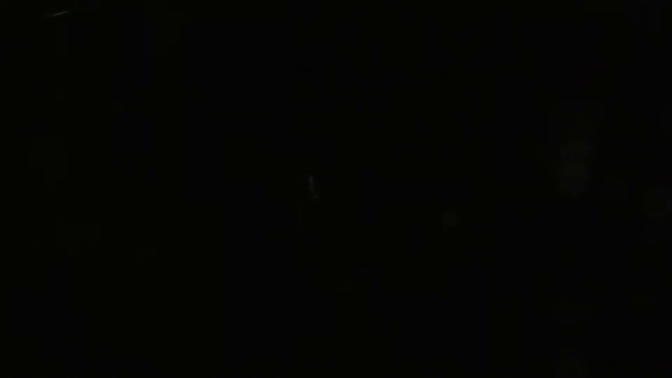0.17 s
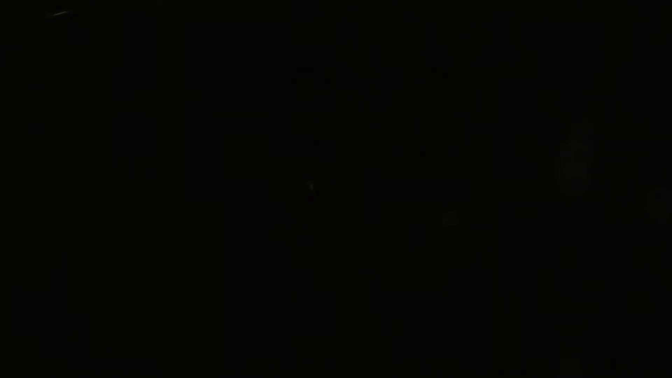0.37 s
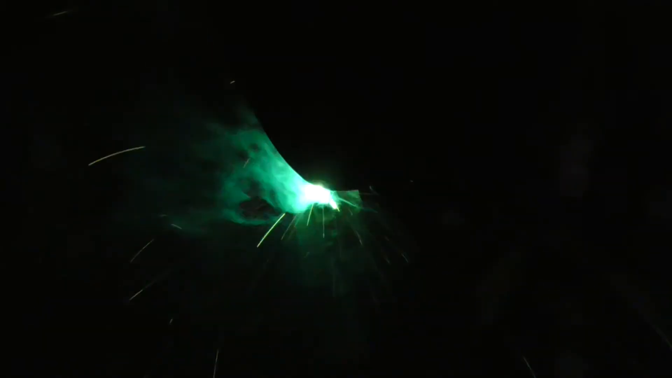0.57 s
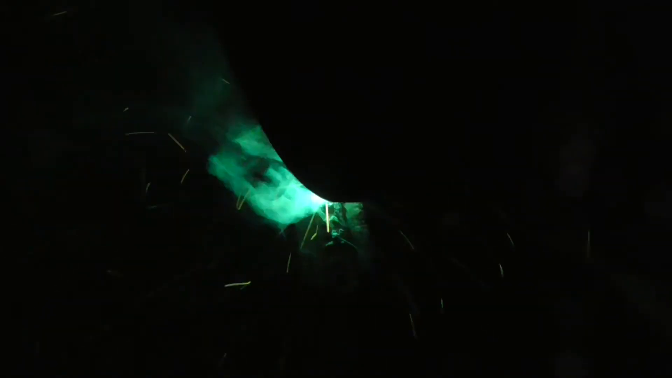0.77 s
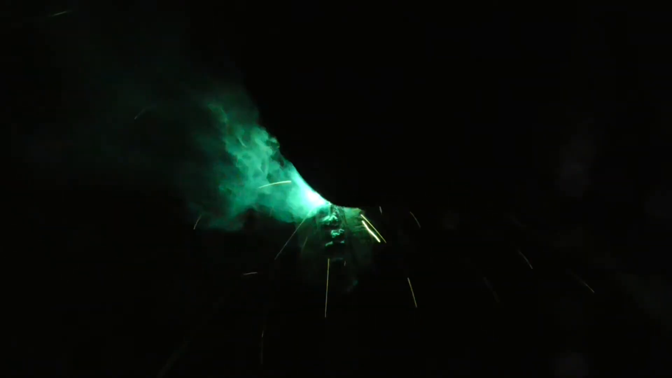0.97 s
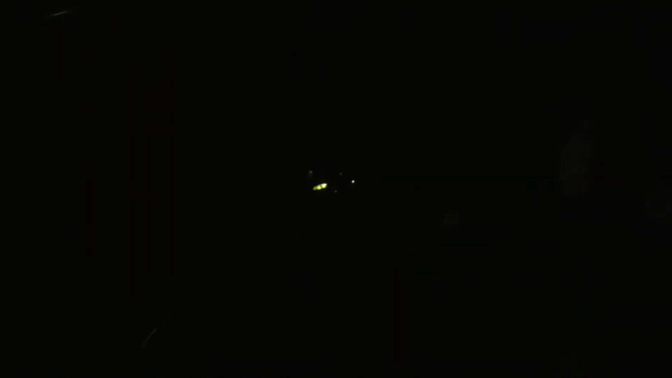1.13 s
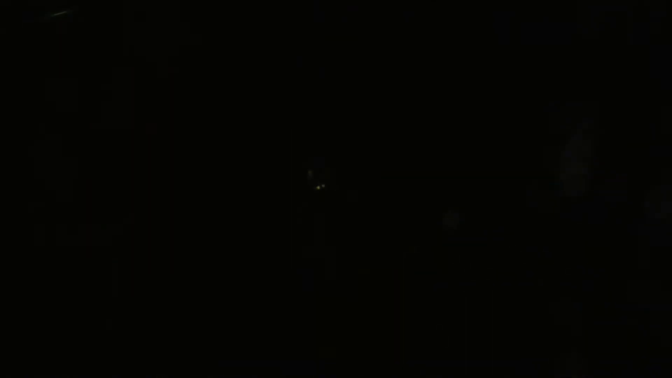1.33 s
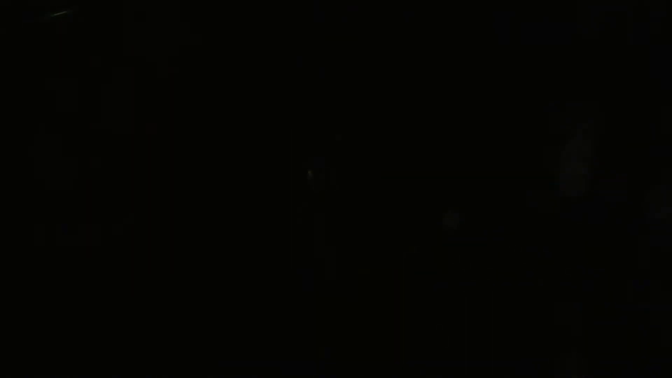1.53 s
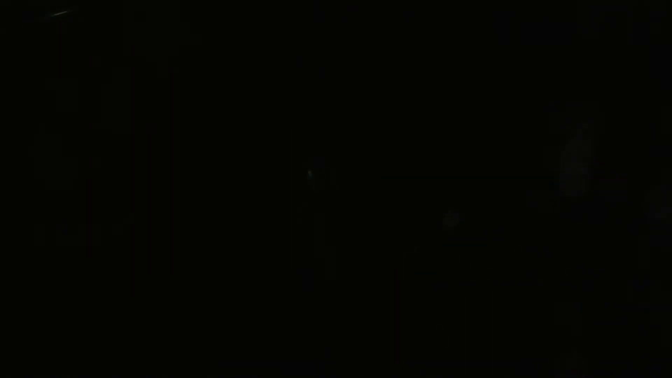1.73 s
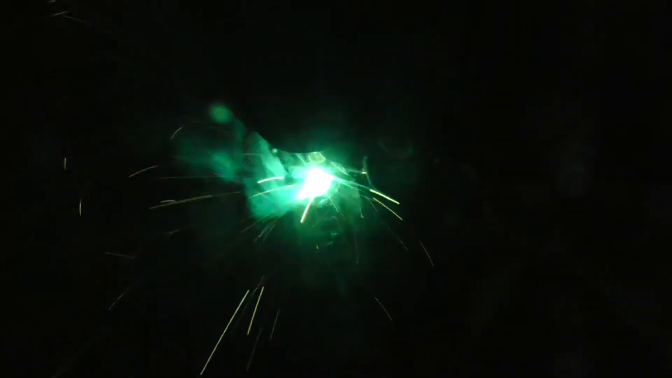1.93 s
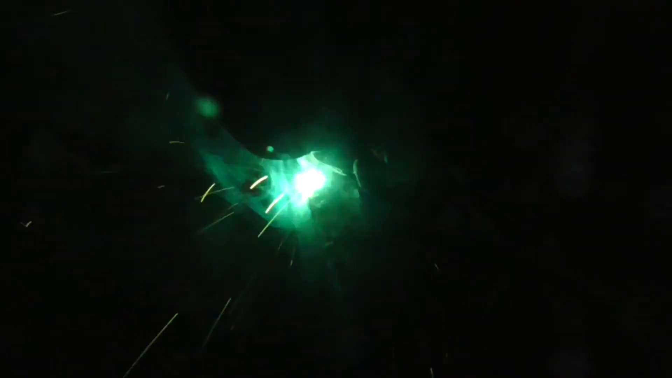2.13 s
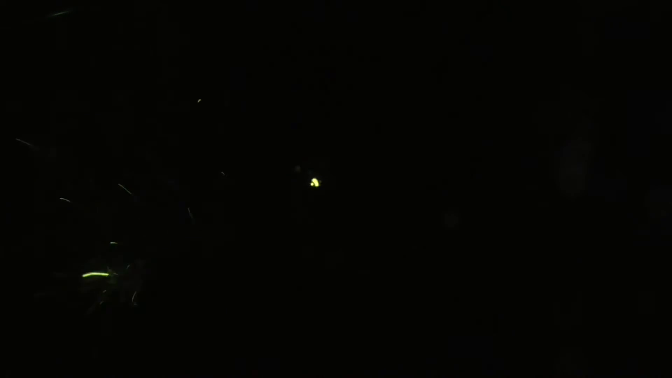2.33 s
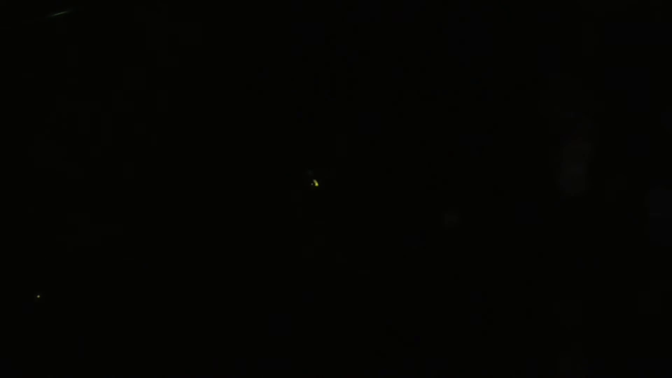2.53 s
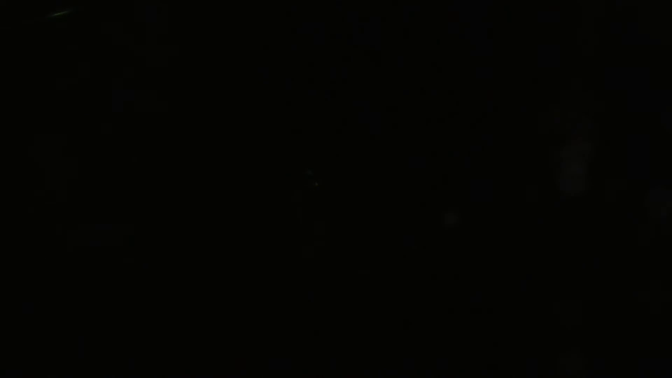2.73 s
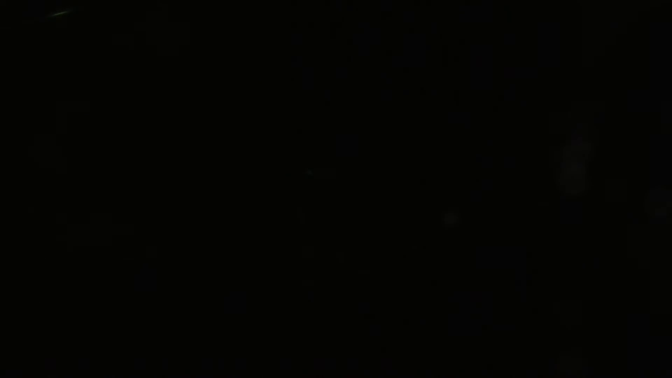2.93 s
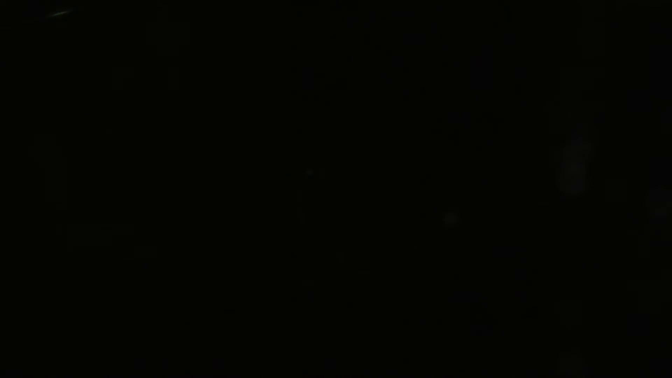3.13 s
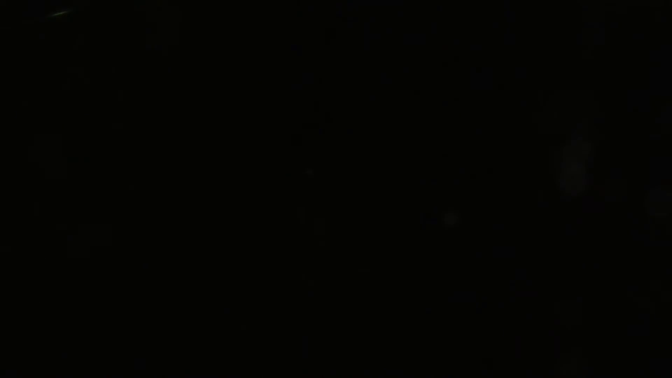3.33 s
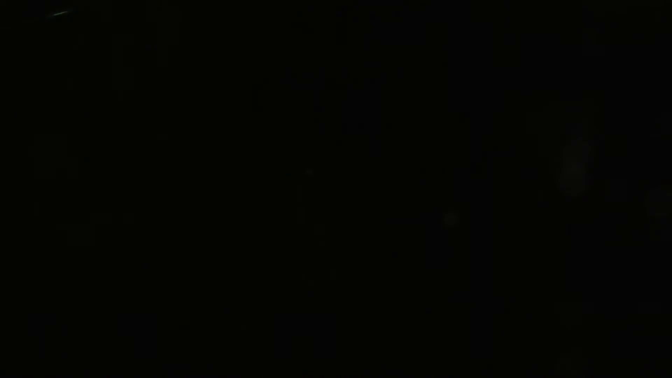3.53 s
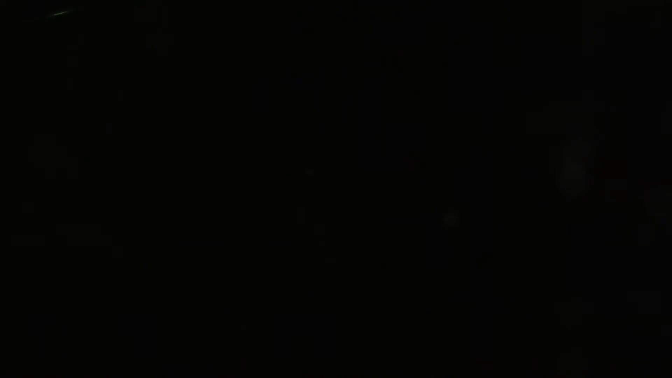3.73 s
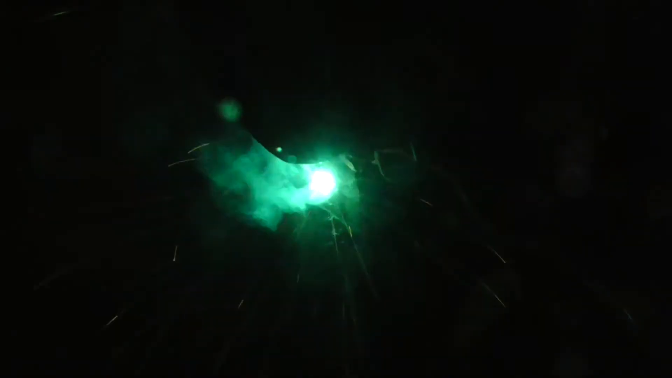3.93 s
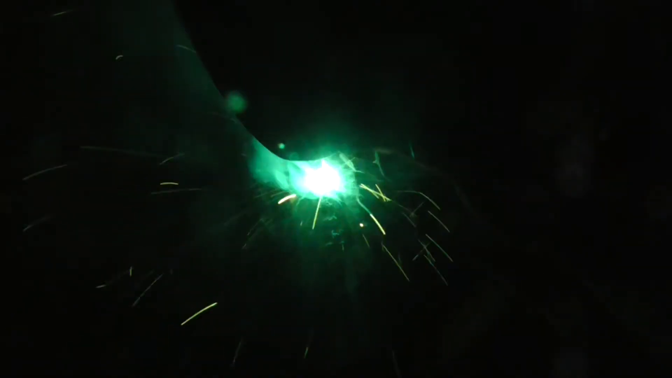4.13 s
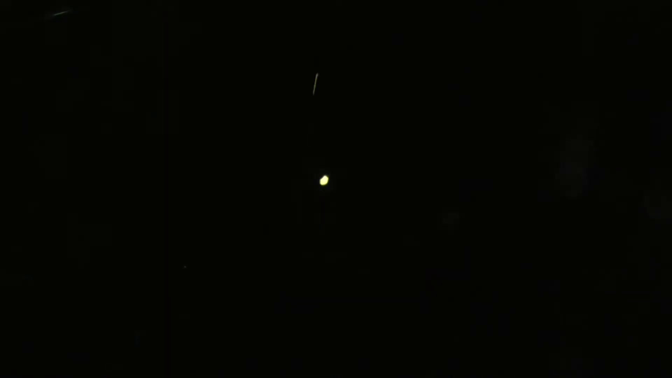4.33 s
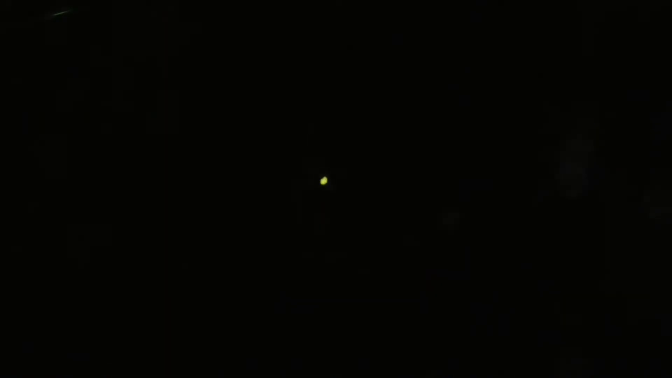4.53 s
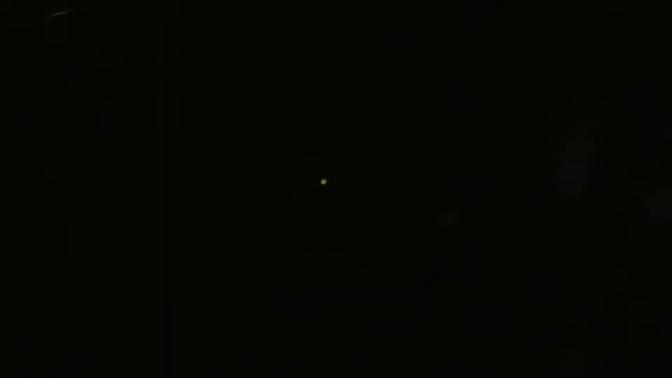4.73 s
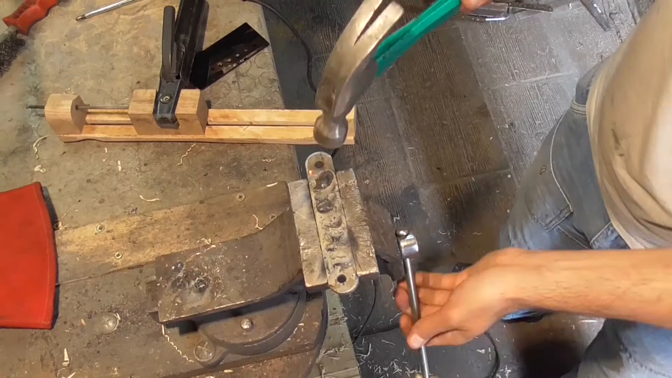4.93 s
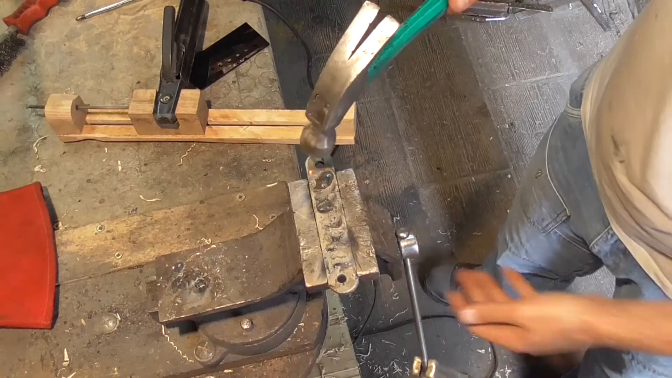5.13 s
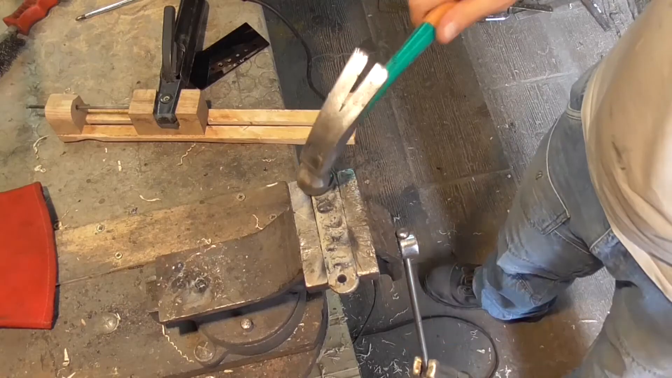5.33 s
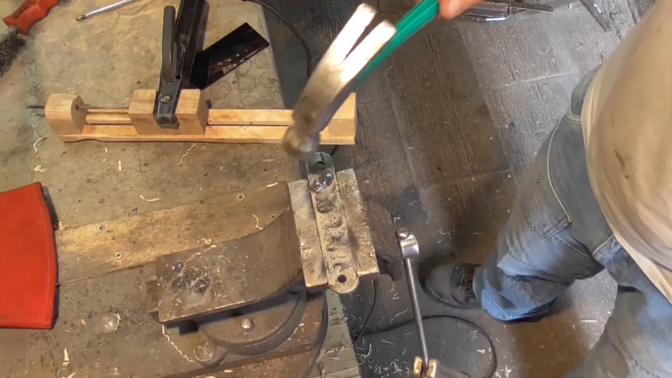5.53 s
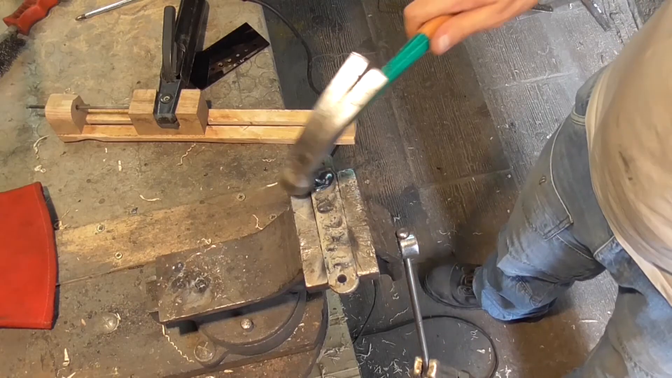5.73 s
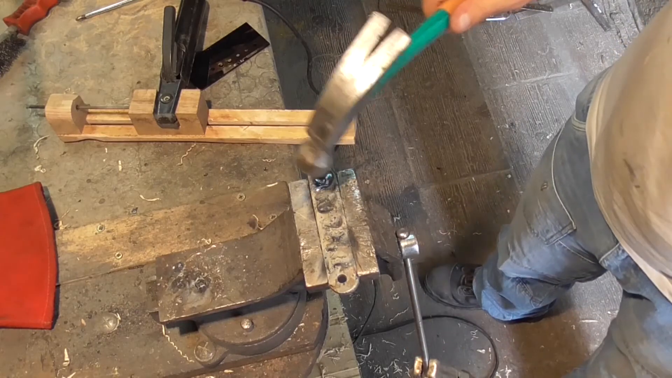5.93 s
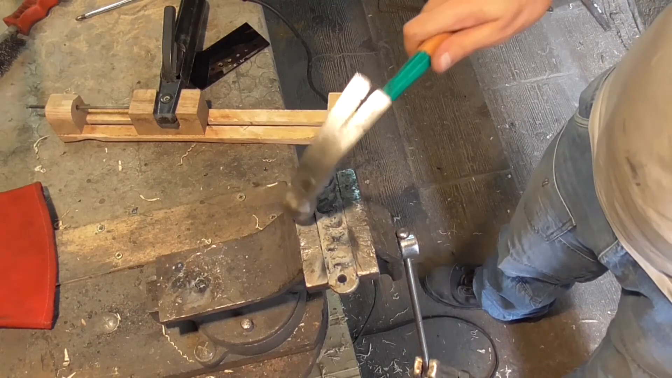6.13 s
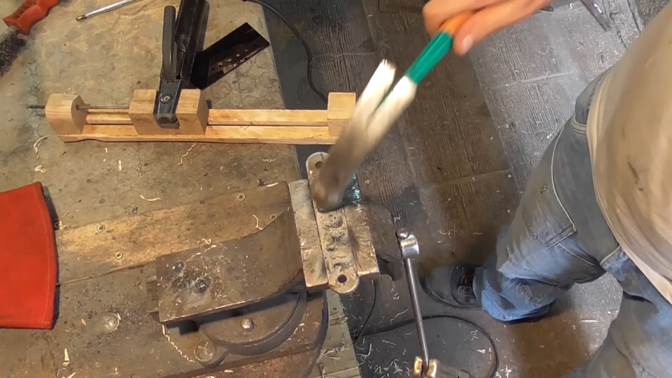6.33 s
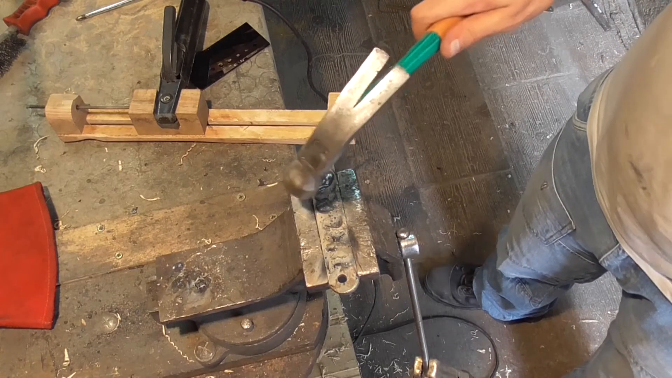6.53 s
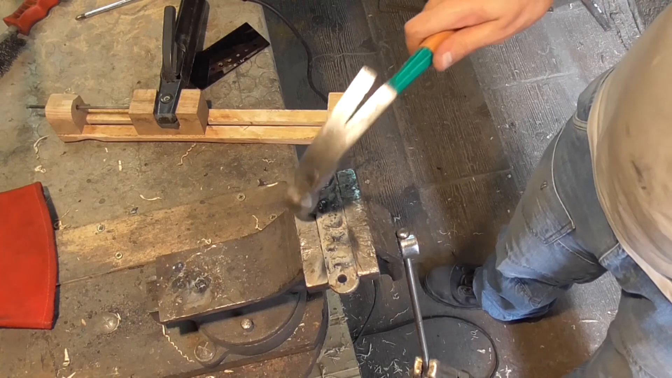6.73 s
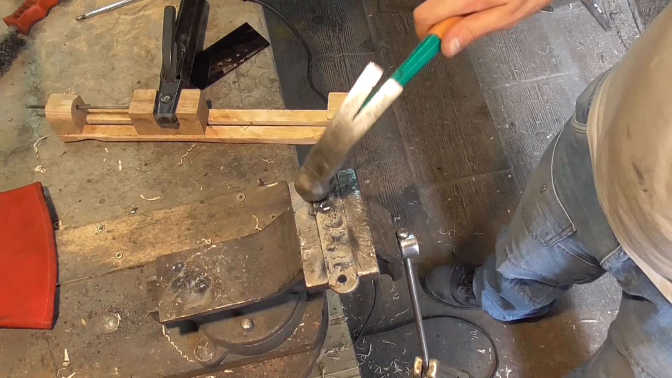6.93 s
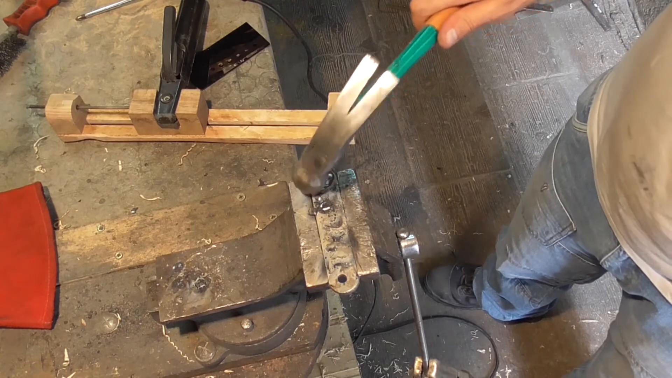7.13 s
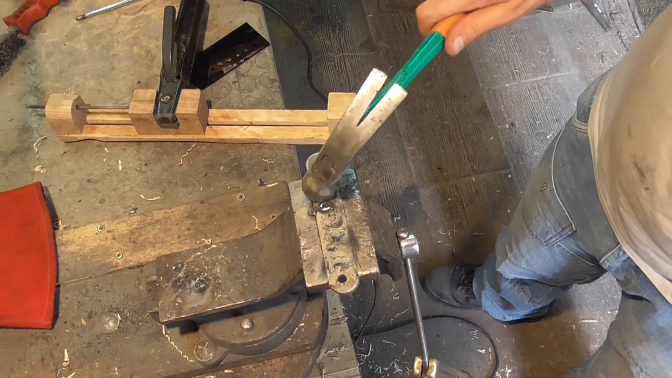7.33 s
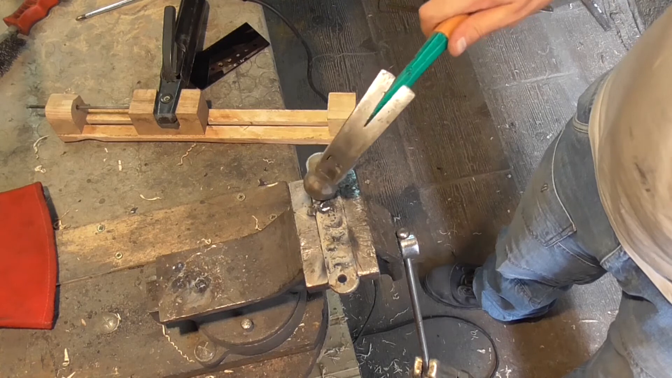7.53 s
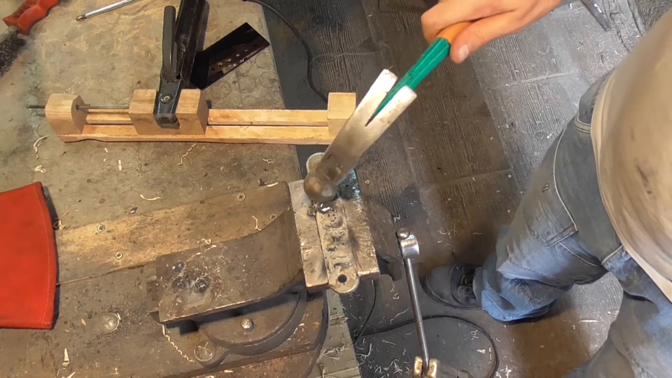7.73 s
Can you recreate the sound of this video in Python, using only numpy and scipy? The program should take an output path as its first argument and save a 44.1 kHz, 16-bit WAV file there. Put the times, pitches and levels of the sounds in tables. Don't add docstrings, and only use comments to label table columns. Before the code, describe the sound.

In a humming metal workshop, welding bursts hiss, snap and stop abruptly; then light clinks and nine quickening metallic hammer strikes ring briefly.

```python
import sys
import numpy as np
from scipy import signal
from scipy.io import wavfile
from scipy.ndimage import uniform_filter1d

SR = 44100
rng = np.random.default_rng(int(sys.argv[2]) if len(sys.argv) > 2 else 0)


def put_to_file(sound):
    columns = np.atleast_2d(sound).T
    safe = np.clip(columns, -1, 1)
    whole_steps = np.round(safe * 32767)
    wavfile.write(sys.argv[1], SR, whole_steps.astype(np.int16))


def boost_factor(decibels):
    exponent = np.asarray(decibels, float) / 20
    return 10 ** exponent


N = 342657

# start in seconds, crack in dB, crack brightness in dB per octave,
# bench boom in dB, vise ring in dB.
BLOWS = [
    (5.4346, -12.5, -2, -19, -20),
    (5.7832, -6.5, 11.5, -16, -12),
    (6.1414, -11, 5, -12, -14.5),
    (6.453, -7, 3.5, -17, -10.5),
    (6.7141, -3, 6.5, -17, -14),
    (6.9666, -4.5, 9, -13, -14.5),
    (7.155, -9, -1.5, -15.5, -17),
    (7.3821, -3.5, 4.5, -16, -13.5),
    (7.595, -8, 0, -16, -10.5),
]
# first band in Hz, its gain in dB,
# second band in Hz, its gain in dB.
LANDINGS = [(471, 4, 1440, 1.5), (570, 3, 1900, 6.5), (540, 1.5, 1100, -0.5), (567, 1.5, 1660, 2.5),
            (503, 1, 870, -1), (1680, -2.5, 390, -4.5), (534, 3, 1140, 6), (640, -1.8, 410, -4),
            (540, 1.5, 1250, 0)]
# tail in dB, tail brightness in dB per octave,
# ringing band in Hz, its gain in dB.
ECHOES = [(1, 1, 3800, 7), (1, -1, 2050, -3), (1, 0, 4800, 4), (-3.5, -2.5, 1760, 10), (1, 1, 3500, 3.5),
          (-2, -2, 3500, 3.5), (1, 2.5, 4300, -4), (0, -1, 7400, 1.5), (-1, 1, 3060, -9)]
# first band in Hz, its gain in dB, second band in Hz,
# its gain in dB, gain around 15 kHz in dB.
FACES = [(4000, 6, 1500, 6, 13), (4060, 8, 6200, 4.5, -8), (3120, -4, 7400, 10, 0),
         (4180, -4, 9200, 7, -0.7), (4000, 6, 6900, -2, 2), (3500, 8, 7600, -6, -6),
         (4000, -4, 7900, 1, 10), (4500, -6, 7500, 2.5, -2), (5000, 5, 6800, -6, 7)]
# first two bench modes in dB,
# first three high vise modes in dB.
MODE_DRIVES = [(-2.5, -2.5, -8, -7, -19), (-10, -1, -3, -2, -1), (2, 2, -10, 1, 5), (-6, -.7, 8, 4, 9),
               (0.5, 2, 6, -.3, 2), (8, 1, -7, 1, -15), (5.5, 2.5, 4, -12, -12), (-1, 4, -1, 0, 2),
               (2, -9.5, 1.3, 3, 9)]
# frequency in Hz (negative swings inward first), level in dB,
# 60 dB decay time in seconds; the other mode tables have the same columns.
BENCH_MODES = [(-228.7, 13.5, 0.16), (297.5, 10, .22), (167, -5, 0.083), (205, 5, 0.17), (241, 19, 0.12),
               (274, 14.5, .13)]
# frequency in Hz, level in dB, decay time in seconds.
VISE_LOW_MODES = [(328.5, 6.5, 0.23), (-349.5, -1, .06), (360.6, 2, .3), (-381.4, 0.5, 0.4),
                  (-395, -9, 0.29), (-428, 5.5, 0.18), (-454.6, -2, 0.19), (-500.4, 10, 0.17),
                  (-526.7, 7, 0.1), (-545, 4.5, 0.17)]
# frequency in Hz, level in dB, decay time in seconds.
VISE_HIGH_MODES = [(-754.6, -4.5, 0.26), (783.5, 6.5, 0.23), (890.5, 4, 0.12), (-585, 10.5, 0.19),
                   (610, -1, .06), (-618, 6, 0.27), (-644, -4, 0.4), (661.5, 10.5, 0.23), (683, -2, 0.055),
                   (-699, -1, 0.37), (720, 4, 0.2), (-747.6, 3.5, 0.3), (869, -5, 0.37), (-946, -7, 0.2)]
# frequency in Hz, level in dB, decay time in seconds.
CLANK_MODES = [(1022, 3, 0.11), (-1049, 2, .12), (1160, 4, 0.17), (-1238, 1, 0.12), (1334, 1.5, 0.11),
               (1486, -2, 0.11), (1528, -2.5, 0.16), (1613, -3.5, 0.15), (1893, 3, 0.073), (2040, -22, 0.2),
               (2202, -4, 0.14), (2249, -23, 0.1), (2355, -5, 0.13), (2520, -4, 0.076)]
# frequency in Hz, level in dB, decay time in seconds.
FLOOR_MODES = [(-60.5, -6.5, 0.4), (71.7, 2.5, 0.75), (-90, 3.5, 0.54), (101.5, 0, 0.3)]
# frequency in Hz, level in dB, decay time in seconds.
CHIP_MODES = [(12020, -8, .1), (12110, 0, 0.18), (12180, -3, .12)]
# frequency in Hz, density in dB per Hz.
CRACK_COLOUR = [(590, -28.5), (1000, -23), (1330, -7.5), (2640, -11), (3900, -6.5), (5620, -21.5),
                (7560, -8), (8410, -17.5), (10900, -14.5), (14000, -25), (16900, -55.5)]
# frequency in Hz, density in dB per Hz.
TAIL_COLOUR = [(71, -28), (120, -15.5), (233, -1.5), (490, -7.5), (727, 1.5), (1470, -18), (1660, -33),
               (2410, -31), (4130, -32), (6520, -38), (10700, -50), (14300, -64), (16900, -88.5)]
# frequency in Hz, 60 dB decay time in seconds.
TAIL_T60 = [(200, 0.92), (800, 0.33), (2000, 0.26), (4500, 0.26), (9000, 0.26), (15000, 0.31)]
# centre in Hz, width in Hz, gain in dB.
HAMMER_BANDS = [(1814, 700, 9.5), (2190, 320, 4.5), (4330, 710, 2.5), (5130, 890, 4), (5770, 600, -6),
                (7560, 700, 2), (8900, 400, -5), (10800, 1100, 7.5), (1703, 90, -1), (2386, 74, 3),
                (3250, 75, 4.5), (3950, 140, 2.5), (4560, 170, 3), (2880, 280, 1.5)]
# frequency in Hz, correlation (no unit).
HIT_SAME = [(60, 0.86), (180, 1), (550, 0.53), (1650, 0.74), (4970, 0.6), (15000, 0.27)]
# frequency in Hz, left minus right in dB.
HIT_PAN = [(60, 0.0), (180, 0.0), (550, 0.91), (1650, 0.41), (4970, 0.49), (15000, -0.89)]
# start in seconds, tick in dB, tick centre in Hz,
# knock on vise and bench in dB, floor thump in dB.
TOUCHES = [(5.0473, -56, 4300, -29, -67), (5.0967, -46, 2240, -27.5, -62), (5.111, -39, 10800, -44, -57),
           (5.1295, -29.5, 3900, -25.5, -31), (5.16, -39, 4300, -49, -46), (5.2066, -35, 4930, -27, -36),
           (5.2367, -57, 5100, -45, -55), (5.3265, -48, 8000, -37, -45), (5.9888, -48, 2570, -42.5, -50),
           (5.9943, -30, 12000, -60, -43), (6.071, -29.5, 3720, -45, -48), (6.228, -30, 2830, -41, -44),
           (6.2563, -30.5, 3880, -65, -44), (6.294, -37, 12000, -53, -57), (6.9252, -52, 2190, -48, -41),
           (7.7546, -39, 11500, -43, -52)]
# start in seconds, tick in dB, tick centre in Hz.
REBOUNDS = [
    (5.799, -24, 12000),
    (4.7, -32, 3000),
    (6.1553, -17, 7900),
    (6.0705, -25.5, 9800),
    (6.2565, -33, 11000),
    (8.1, -32, 12000),
]
# strike in seconds, break in seconds, hiss in dB, sag of the hiss in dB per second,
# further sag of the fizz above 6 kHz in dB per second.
ARCS = [
    (0.487, 1.097, -32, -1.5, 18),
    (1.912, 2.284, -29, 16, 13),
    (3.904, 4.342, -31.5, 6, 17),
]
# centre in Hz, width in Hz, gain in dB.
SEAMS = [
    [(2070, 73, -1), (3700, 120, 5), (4590, 70, 7), (7900, 150, 7), (6300, 900, 1.5)],
    [(2140, 150, -3), (4830, 130, 3), (7040, 150, 1), (11800, 900, 0.5), (8600, 600, -4)],
    [(2150, 150, -6), (2370, 150, 5), (10100, 200, 1), (11500, 700, 0), (6300, 770, 0.5)],
]
# frequency in Hz, level in dB.
LOADS = [
    (600, -49.5),
    (700, -52.5),
    (700, -56),
]
CATCHES = [
    (0.02,),
    (0.011,),
    (.011,),
]
# frequency in Hz, density in dB per Hz.
ARC_COLOUR = [(59, -38), (100, -9.5), (479, -0.5), (533, 1.5), (594, -1.5), (1080, -6.5), (1290, -4.5),
              (1400, -14), (2110, -9.5), (3100, -11), (3760, -7), (6290, -9.5), (11500, -3.5), (15750, -10),
              (16100, -60)]
# centre in Hz, width in Hz, gain in dB.
ARC_BANDS = [(2090, 260, 9.5), (2810, 190, 8), (3720, 940, 3.5), (4800, 260, 1), (7570, 970, 3),
             (9600, 330, 2.5), (11450, 520, 4.5), (13300, 600, 4.5)]
# frequency in Hz, correlation (no unit).
ARC_SAME = [(60, -0.16), (180, -0.24), (550, -0.24), (1650, -0.0027), (4970, -0.02), (15000, -0.016)]
# frequency in Hz, left minus right in dB.
ARC_PAN = [(60, 0), (180, -5.5), (550, 2.5), (1650, -1.5), (4970, 5), (15000, -5.5)]
# mains multiple in Hz, level in dB.
BUZZ = [(400, -0.5), (500, -5.5), (600, 1), (700, 3), (800, -9), (1000, 0.5), (1300, 1)]
# start in seconds, pop in dB, flare in dB.
POPS = [(0.511, -40, -27), (0.533, -34, -17.5), (0.593, -45, -22), (0.658, -37.5, -26), (0.716, -50, -42),
        (0.858, -49, -33), (0.934, -39, -26), (1.028, -38, -27), (1.923, -37, -32), (1.943, -35, -26),
        (2.009, -46, -37), (2.1, -57, -44), (2.175, -41, -32), (2.254, -41, -24), (3.917, -30, -22),
        (3.942, -44, -19.5), (3.971, -39, -24), (4.003, -33.5, -21), (4.065, -53, -24), (4.11, -43, -31),
        (4.155, -40, -25), (4.194, -63, -30), (4.254, -61, -26.5), (4.318, -44, -31)]
# start in seconds, level in dB, centre in Hz,
# width in octaves, length in seconds.
SIZZLES = [(0.105, -54, 3400, 0.58, 0.11), (0.2, -54.5, 3300, 0.74, 0.13), (0.019, -47, 890, 1.02, 1),
           (1.316, -59, 3500, 1.2, 0.03), (2.324, -53, 10000, 1.4, 0.019), (2.42, -56, 8000, 2.6, 0.036),
           (2.438, -54, 7500, 1.4, 0.11), (2.66, -58, 3900, 0.26, 0.06), (2.814, -59, 3300, 0.79, 0.04),
           (2.958, -61, 4000, 0.32, 0.049), (3.823, -51.5, 3000, 3, 0.025), (4.4, -64, 3750, .2, 0.1),
           (4.503, -60, 2500, 1.5, 0.056), (4.6, -58.5, 9000, 1.83, 0.032), (4.708, -56, 3500, 0.98, 0.045),
           (5.038, -64, 4700, 0.28, 0.088), (5.13, -56, 4430, 0.46, 0.14), (5.247, -68, 4960, 0.18, 0.076),
           (5.302, -66, 4800, 0.2, 0.17), (5.067, -56, 1200, 1.2, 0.23), (3.82, -55, 7800, 0.32, .03),
           (5.096, -51, 820, 1.2, 0.028), (5.324, -51, 820, 0.95, 0.023), (5.2, -64, 5000, 0.13, 0.13),
           (7.362, -56, 5040, 1.7, 0.017), (5.99, -46, 14000, .5, .022), (5.845, -51, 12000, .6, .012),
           (6.298, -56, 4400, 0.32, 0.044)]
# start in seconds, length in seconds, level in dB, start in Hz, end in Hz.
CHIRPS = [
    (2.656, .036, -53, 4350, 3750),
    (2.69, .03, -63, 3600, 4000),
    (4.405, .04, -62, 4000, 3700),
    (2.82, .016, -56, 2800, 1850),
]
# time in seconds, noise in dB, mains hum in dB.
SHOP = [
    (0, -39, -54),
    (.45, -38, -59),
    (1.5, -40, -54.5),
    (2.75, -39.5, -59),
    (3.3, -41.5, -57.5),
    (4.0, -40.5, -52.5),
    (4.699, -40, -50.5),
    (5.19, -42.5, -55.5),
    (5.3, -42.5, -58),
    (7.77, -44, -51.5),
]
# frequency in Hz, density in dB per Hz.
SHOP_COLOUR = [(12, -35), (20, -21), (97, -15.5), (132, -24), (253, -4), (397, -14.5), (432, -12),
               (624, -15.5), (760, -16.5), (850, -22), (979, -19.5), (2350, -35.5), (10200, -42),
               (15600, -47), (16200, -76)]
# centre in Hz, width in Hz, gain in dB.
SHOP_BANDS = [(96, 25.3, 13), (240, 30, 3), (472, 29, 5.5), (775, 36, 5.5), (1700, 190, -6.5),
              (3860, 500, 3.5), (10500, 2100, 4.5), (10140, 400, 5), (6550, 110, 4), (5800, 660, -6),
              (256, 10, 0.5)]
# centre in Hz, width in Hz, gain in dB.
BENCH_BANDS = [(73.7, 30, -16.5), (252, 110, -36.5), (650, 140, 3.5), (2000, 900, -3), (4870, 700, 3.5),
               (11100, 2600, 6.5)]
# frequency in Hz, correlation (no unit).
SHOP_SAME = [(60, -0.12), (180, -0.33), (550, -0.04), (1650, 0.16), (4970, -0.053), (15000, 0.098)]

MOVE_S = 5.02
TREBLE_DB, TREBLE_AT_VISE_DB = -3.5, -6
CHIP_S, CHIP_DB = 6.295, -59
LOOSE_DB, TIGHT_DB, LOOSEN_S = -16.5, -27, 0.55
SETTLE_S, SETTLE_DB = 0.032, -1.5
TICK_T60_S, THUMP_T60_S = 0.14, 0.29
WIDE, SLIP = 0.36, 0.29
FIZZ_DB, ROAR_DB = 4.5, -11
BUZZ_DB, BUZZ_SAG_DB_PER_S = -54.5, 8
FIZZ_LAG_S, FIZZ_LAG_DB = 0.011, -18
BREAK_DB_PER_S = 805
AFTERGLOW_DB, AFTERGLOW_DB_PER_S = -24, 250
DRIFT_DB = 1.5
CRACKLE_PER_S, CRACKLE_DB, CRACKLE_SPREAD_DB = 900, -12, 3
FINE_TAIL_DB, FINE_ARC_DB = 1.8, 1.2
ARC_DUCK_DB, ARC_DUCK_S, BLOW_DUCK_DB = -11, 0.15, -5.5
HOLD_S, RECOVER_S = 0.053, 0.039
HISS_SPARED = 0.7


def evened(x):
    return x / np.sqrt(np.mean(x ** 2) + 1e-20)


def read(points, hz):
    f, value = np.transpose(points)
    return np.interp(np.log(hz + 1), np.log(f + 1), value)


def add(mix, s, sound):
    part = mix[:, round(s * SR):][:, :sound.shape[1]]
    part += sound[:, :part.shape[1]]


def humps_db(bands, hz):
    return sum(db / (1 + (2 * (hz - f) / width) ** 2) for f, width, db in bands)


def peak(x, hz, db, sharp):
    return x + (boost_factor(db) - 1) * signal.lfilter(*signal.iirpeak(hz, sharp, fs=SR), x)


def ripple(hz, step_hz):
    return sum(np.sin(hz / (step_hz * k) + k * k) for k in (1, 1.6, 2.7))


def share_db(colour_db, lo_hz, hi_hz):
    hz = np.linspace(lo_hz, hi_hz, num=400)
    density = np.mean(boost_factor(colour_db(hz)) ** 2)
    return -10 * np.log10(density * (hi_hz - lo_hz) / (SR / 2))


def noise(count, size, level_db, same, pan, patchy_db):
    hop = size // 4
    frames = count // hop + 5
    hz = np.fft.rfftfreq(size, 1 / SR)[:, None]
    a, b, c, d, patches = rng.standard_normal((frames, len(hz), 5)).T
    patches = uniform_filter1d(patches, size=len(hz) // 40, axis=0)
    patches = evened(uniform_filter1d(patches, size=8, axis=1))
    like = np.clip(read(same, hz), -1, 1)
    left = a + 1j * b
    right = like * left + np.sqrt(1 - like ** 2) * (c + 1j * d)
    balance = boost_factor(read(pan, hz) / 2)
    z = np.array([left * balance, right / balance])
    z *= boost_factor(level_db(hz, np.arange(frames) * hop / SR) + patchy_db * patches)
    return signal.istft(z, nperseg=size, noverlap=size - hop)[1][:, :count] * np.sqrt(2 / size)


def ring(modes, seconds, rise_s, spread, own_db=()):
    t = np.arange(round(seconds * SR), dtype=np.float32) / np.float32(SR)
    draw = (rng.standard_normal((len(modes), 3)) * spread).tolist()
    extra = list(own_db) + [0] * len(modes)
    out = 0
    for k, ((hz, db, t60), (level, tune, slip)) in enumerate(zip(modes, draw)):
        ears = np.float32([[1], [-1]]) * np.float32((-1) ** k * WIDE * min(abs(hz) / 700, 1))
        phase = np.float32(2 * np.pi * hz * (1 + 0.0014 * tune)) * t
        phase = phase + np.float32(SLIP * slip * hz / 500) + ears
        out = out + boost_factor(db + extra[k] + 1.63 * level - 60 * t / t60) * np.sin(phase)
    out = out * (1 - np.exp(-t / rise_s))
    return out / np.sqrt(np.mean(out[:, :1300] ** 2))


def blow(s, crack_db, bright_db, boom_db, ring_db, landing, echo, face, drive_db):
    tight_db = TIGHT_DB * np.exp((BLOWS[0][0] - s) / LOOSEN_S)
    tail_db, tail_bright_db, *echo_band = echo
    out = boost_factor(-32.0 + 0.19 * (crack_db + 5.0) + tail_db) * tail(
        0.6, 0.28 * bright_db + tail_bright_db, 0.23 * tight_db)
    out = peak(out, *echo_band, sharp=6.7)
    t = np.arange(out.shape[1]) / SR
    settled = 1 / (1 + np.exp(-(t - SETTLE_S) / 0.0055))
    boom = ring(BENCH_MODES, 0.6, rise_s=0.0054, spread=0.5, own_db=drive_db[:2])
    out += boost_factor(boom_db - 0.8 + SETTLE_DB * settled) * boom
    out += boost_factor((boom_db + ring_db) / 2 - 5.0) * ring(VISE_LOW_MODES, 0.6, rise_s=0.0042, spread=0.92)
    vise = ring(VISE_HIGH_MODES, 0.6, rise_s=0.0018, spread=0.5, own_db=drive_db[2:])
    out += boost_factor(ring_db - 5.0) * vise
    out += boost_factor(LOOSE_DB + tight_db - 12.5) * ring(CLANK_MODES, 0.6, rise_s=0.00054, spread=1.06)
    out = peak(out, *landing[:2], sharp=4.7)
    out = peak(out, *landing[2:], sharp=5.8)
    out *= boost_factor(-2 / (1 + np.exp(-(t - 0.038) / 0.022)))
    out += boost_factor(0.38 * boom_db - 36.0) * ring(FLOOR_MODES, 0.6, rise_s=0.0089, spread=0.88)
    add(out, 0, boost_factor(crack_db - 1.2) * crack(bright_db, tight_db, face))
    return s, signal.sosfilt(signal.butter(6, 50, "high", fs=SR, output="sos"), out)


def crack(bright_db, tight_db, face):
    t = np.arange(1000) / SR

    def shape(hz, t):
        tilt = bright_db * np.log2((hz + 500) / 6000)
        return read(CRACK_COLOUR, hz) + tilt + 0.11 * tight_db / (1 + (hz / 1600) ** 4) + 0 * t

    burst = evened(noise(len(t), 256, shape, HIT_SAME, HIT_PAN, patchy_db=1.5))
    burst = peak(burst, *face[:2], sharp=3.5)
    burst = peak(burst, *face[2:4], sharp=6.3)
    burst = peak(burst, 15000, face[4], sharp=3.1)
    fade = np.exp(-t / 0.00045) + 0.31 * np.exp(-t / 0.002) + 0.048 * np.exp(-t / 0.0074)
    return burst * (1 - np.exp(-t / 0.0001)) * fade


def tail(seconds, bright_db, tight_db):
    rings = [(f, w, db * rng.uniform(0.7, 1.42)) for f, w, db in HAMMER_BANDS]

    def colour(hz):
        bass_cut = 10 / (1 + (hz / 1000) ** 4) + 12 / (1 + (hz / 170) ** 8)
        clamped = tight_db / (1 + ((hz - 1200) / 500) ** 2)
        return read(TAIL_COLOUR, hz) + humps_db(rings, hz) - bass_cut + clamped

    offset = share_db(colour, 3000, 16000)

    def shape(hz, t):
        tilt = bright_db * np.log2(np.maximum(hz, 3000) / 6000)
        fine = FINE_TAIL_DB * ripple(hz, step_hz=24)
        return colour(hz) + tilt + fine + offset - 60 * t / read(TAIL_T60, hz)

    out = noise(round(seconds * SR), 1024, shape, HIT_SAME, HIT_PAN, patchy_db=3.0)
    return out * (1 - np.exp(-np.arange(out.shape[1]) / SR / 0.00042))


def touch(s, tick_db, tick_hz, knock_db, thump_db, wash=0.37):
    t = np.arange(11000) / SR
    seconds = len(t) / SR

    def shape(hz, t):
        slope = -7 * abs(np.log2((hz + 50) / tick_hz))
        return tick_db + slope + humps_db(HAMMER_BANDS, hz) - 14 * (hz / 13000) ** 6 + 0 * t

    fade = np.exp(-t / 0.0019) + wash * boost_factor(-60 * t / TICK_T60_S)
    tick = 0.91 * noise(len(t), 256, shape, HIT_SAME, HIT_PAN, patchy_db=0.5)
    tick = tick * fade * (1 - np.exp(-t / 0.00029))
    knock = boost_factor(knock_db - 10.5) * ring(VISE_LOW_MODES + VISE_HIGH_MODES, seconds, rise_s=0.0016, spread=2.95)
    knock += boost_factor(knock_db - 10.5) * ring(BENCH_MODES, seconds, rise_s=0.013, spread=1.4)
    knock += boost_factor(knock_db - 21.5) * ring(CLANK_MODES[:5], seconds, rise_s=0.0006, spread=1.5)
    thump = ring(FLOOR_MODES[2:], seconds, rise_s=0.018, spread=0.4)
    return s, tick + knock + boost_factor(thump_db - 4.0 - 60 * t / THUMP_T60_S) * thump


def rebound(s, tick_db, tick_hz):
    return touch(s, tick_db, tick_hz, -68.5, -77.5, wash=0.15)


def slag_chip():
    return CHIP_S, boost_factor(CHIP_DB) * ring(CHIP_MODES, 0.16, rise_s=0.0068, spread=0.8)


def arc(strike, stop, hiss_db, sag, fizz_sag, seam, load, catch):
    burn_s = stop - strike
    count = round((burn_s + 0.12) * SR)
    t = np.arange(count) / SR
    hiss = arc_hiss(count, burn_s, hiss_db, sag, fizz_sag, seam)
    flicker = uniform_filter1d(rng.standard_normal(count), size=260)
    flicker = evened(uniform_filter1d(flicker, size=130))
    sparks = rng.exponential(1, count) * (rng.random(count) < 400 / SR)
    sparks = uniform_filter1d(sparks, size=12) * 12
    grain = boost_factor(1.8 * flicker) * (0.9 + 0.24 * sparks)
    snaps = crackle(count) * boost_factor(hiss_db + CRACKLE_DB - sag * t)
    hum = buzz(t, load) * boost_factor(3.2 * evened(uniform_filter1d(flicker, size=1500)))
    after = np.maximum(t - burn_s, 0)
    dying = np.maximum(boost_factor(-BREAK_DB_PER_S * after), boost_factor(AFTERGLOW_DB - AFTERGLOW_DB_PER_S * after))
    burning = np.minimum(t / catch[0], 1) ** 2 * dying
    top = signal.butter(14, 15800, fs=SR, output="sos")
    return strike, signal.sosfilt(top, (hiss * grain + snaps + hum) * burning)


def arc_hiss(count, burn_s, hiss_db, sag, fizz_sag, seam):
    def colour(hz):
        return read(ARC_COLOUR, hz) + humps_db(ARC_BANDS + seam, hz)

    low, mid, high = share_db(colour, 500, 1400), share_db(colour, 1500, 6000), share_db(colour, 6000, 16000)

    def shape(hz, t):
        up = 1 / (1 + (6000 / (hz + 1)) ** 6)
        down = 1 / (1 + (hz / 1450) ** 6)
        fizz_db = FIZZ_DB - fizz_sag * t + FIZZ_LAG_DB * np.exp(-t / FIZZ_LAG_S)
        fizz_db = fizz_db - 0.52 * BREAK_DB_PER_S * np.clip(t - burn_s + 0.014, 0, 0.035)
        drift = uniform_filter1d(rng.standard_normal((len(t), len(hz))).T, size=6, axis=0)
        drift = evened(uniform_filter1d(drift, size=24, axis=1))
        fine = FINE_ARC_DB * ripple(hz, step_hz=44.8)
        bands = up * (high + fizz_db) + down * (low + ROAR_DB) + (1 - up - down) * mid
        return DRIFT_DB * drift + fine + colour(hz) + hiss_db - sag * t + bands

    return noise(count, 512, shape, ARC_SAME, ARC_PAN, patchy_db=1.5)


def crackle(count):
    snaps = boost_factor(CRACKLE_SPREAD_DB * np.minimum(rng.exponential(1, count), 3))
    snaps = snaps * (rng.random(count) < CRACKLE_PER_S / SR)
    snaps = signal.lfilter([1], [1, -0.6], snaps * rng.standard_normal((2, count)))
    return evened(signal.sosfilt(signal.butter(2, 1200, "high", fs=SR, output="sos"), snaps))


def buzz(t, load):
    sag_db = BUZZ_SAG_DB_PER_S * t
    out = sum(boost_factor(db) * np.sin(2 * np.pi * hz * t + hz) for hz, db in BUZZ) * boost_factor(BUZZ_DB - sag_db)
    hz, db = load
    return out + boost_factor(db - sag_db) * np.sin(2 * np.pi * hz * t + hz)


def pop(s, pop_db, flare_db):
    t = np.arange(1800) / SR
    swell = (t / 0.0064 * np.exp(1 - t / 0.0077)) ** 2

    def shape(hz, t):
        return read(ARC_COLOUR, hz) + humps_db(ARC_BANDS, hz) + 0 * t

    flare = evened(noise(len(t), 256, shape, ARC_SAME, ARC_PAN, patchy_db=-2.5))
    band = signal.butter(2, [130, 800], "band", fs=SR)
    thud = evened(signal.lfilter(*band, rng.standard_normal(len(t))))
    return s - 0.005, swell * (boost_factor(flare_db - 7.5) * flare + boost_factor(pop_db - 4.5) * thud)


def sizzle(s, db, centre_hz, octaves, seconds):
    def shape(hz, t):
        return -12 * (np.log2((hz + 50) / centre_hz) / octaves) ** 2 - 9 * (hz / 13500) ** 6 + 0 * t

    u = np.linspace(0, 1, round(seconds * SR))
    puff = evened(noise(len(u), 256, shape, ARC_SAME, ARC_PAN, patchy_db=0.5))
    return s, boost_factor(db) * puff * np.sin(np.pi * np.sqrt(u))


def chirp(s, seconds, db, start_hz, end_hz):
    u = np.linspace(0, 1, round(seconds * SR))
    rough_hz = 600 * uniform_filter1d(rng.standard_normal((2, len(u))), size=60, axis=1)
    hz = start_hz + (end_hz - start_hz) * u + rough_hz
    tone = np.sqrt(2) * np.sin(2 * np.pi * np.cumsum(hz, axis=1) / SR)
    return s, boost_factor(db) * np.sin(np.pi * u) * tone


def duck_db(t):
    def back(end):
        return 1 / (1 + np.exp(np.clip((t - end - HOLD_S) / RECOVER_S - 2, -50, 50)))

    dips = []
    for a, b, *_ in ARCS:
        dips.append(ARC_DUCK_DB * (1 - np.exp(-np.clip(t - a, 0, b - a) / ARC_DUCK_S)) * back(b))
    for s, *_ in BLOWS:
        dips.append(BLOW_DUCK_DB * (t > s) * back(s + 0.077))
    return np.min(dips, axis=0)


def shop():
    s, level_db, hum_db = np.transpose(SHOP)
    offset = share_db(lambda hz: read(SHOP_COLOUR, hz), 180, 450)

    def shape(hz, t):
        duck = duck_db(t)
        place = np.where(t < MOVE_S, humps_db(SHOP_BANDS, hz), humps_db(BENCH_BANDS, hz))
        treble_db = np.where(t < MOVE_S, TREBLE_DB, TREBLE_AT_VISE_DB) - HISS_SPARED * duck
        level = offset - 3 + np.interp(t, s, level_db) + duck
        return read(SHOP_COLOUR, hz) + place + level + treble_db * (hz / (hz + 1500))

    t = np.arange(N) / SR
    duck = np.interp(t, t[::200], duck_db(t[::200]))
    line = np.sin(2 * np.pi * 300 * t) + 0.33 * np.sin(2 * np.pi * 100 * t)
    hum = np.sqrt(2) * boost_factor(np.interp(t, s, hum_db) + 0.44 * duck) * line
    return noise(N, 2048, shape, SHOP_SAME, [(100, -1.3), (10000, -0.74)], patchy_db=1) + hum


def scene():
    mix = shop()
    blows = [row + tuple(own) for row, *own in zip(BLOWS, LANDINGS, ECHOES, FACES, MODE_DRIVES)]
    arcs = [row + tuple(own) for row, *own in zip(ARCS, SEAMS, LOADS, CATCHES)]
    sources = ((blow, blows), (touch, TOUCHES), (rebound, REBOUNDS), (arc, arcs), (pop, POPS),
               (sizzle, SIZZLES), (chirp, CHIRPS))
    for source, table in sources:
        for row in table:
            add(mix, *source(*row))
    add(mix, *slag_chip())
    return mix


def roll_off(x):
    return signal.sosfilt(signal.butter(12, 17040, fs=SR, output="sos"), x)


def record(dry):
    limited = 0.86 * np.tanh(dry / 0.86)
    band = signal.firwin(255, 16500, fs=SR)
    return roll_off(signal.oaconvolve(limited, band[None], "same"))


dry = scene()
out = record(dry)
put_to_file(out)
```